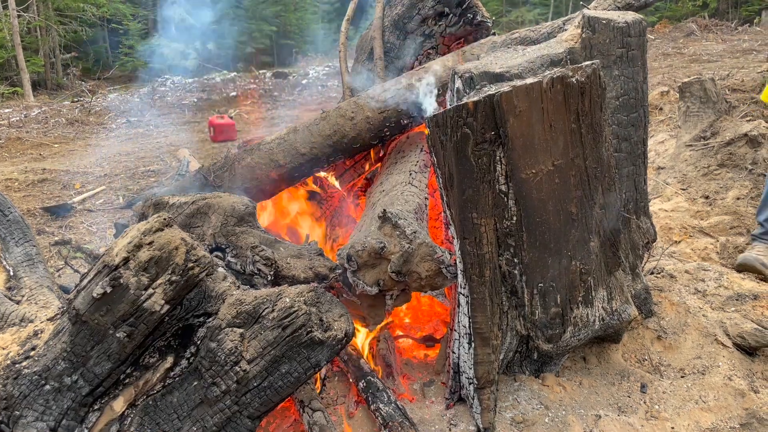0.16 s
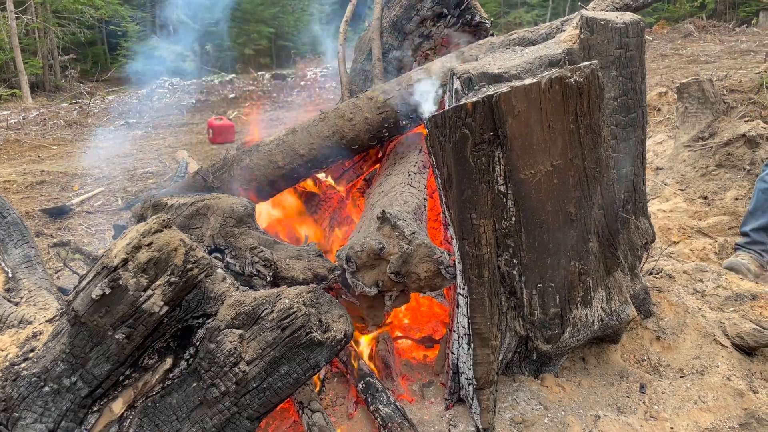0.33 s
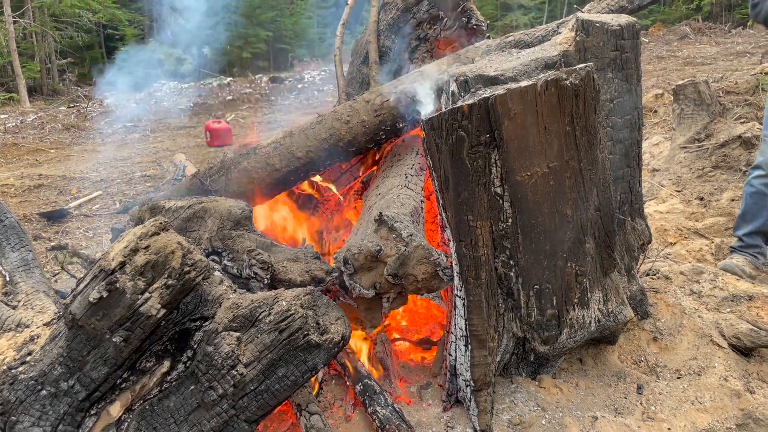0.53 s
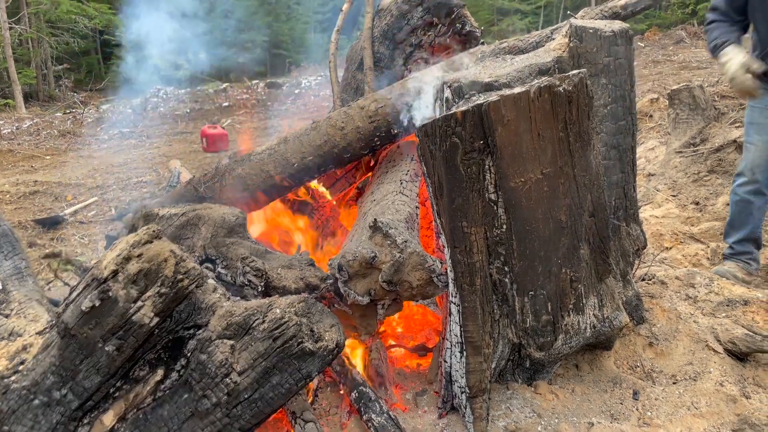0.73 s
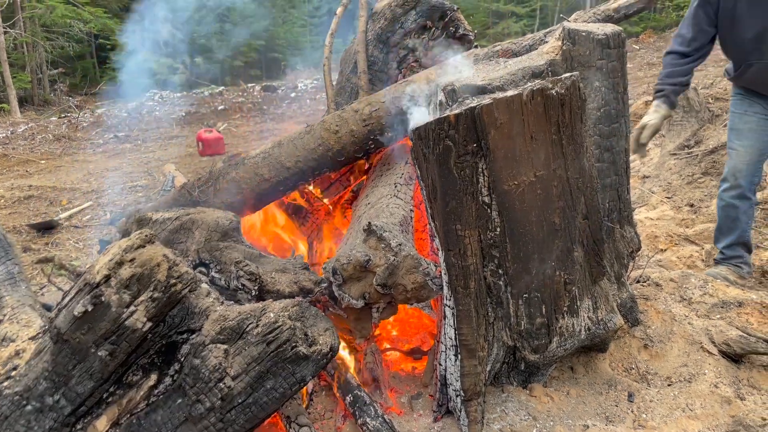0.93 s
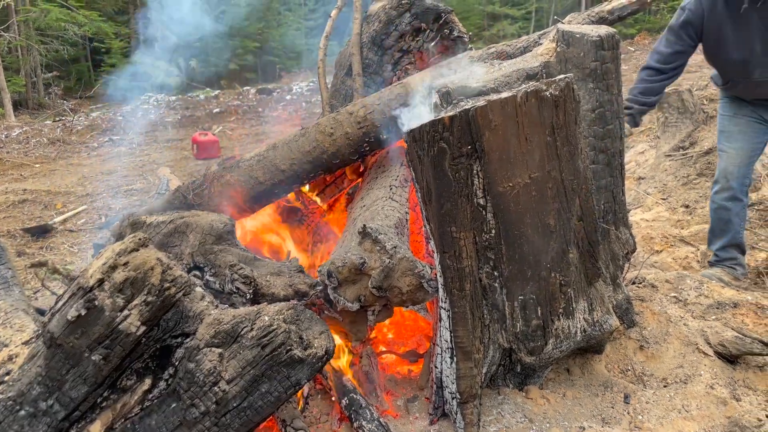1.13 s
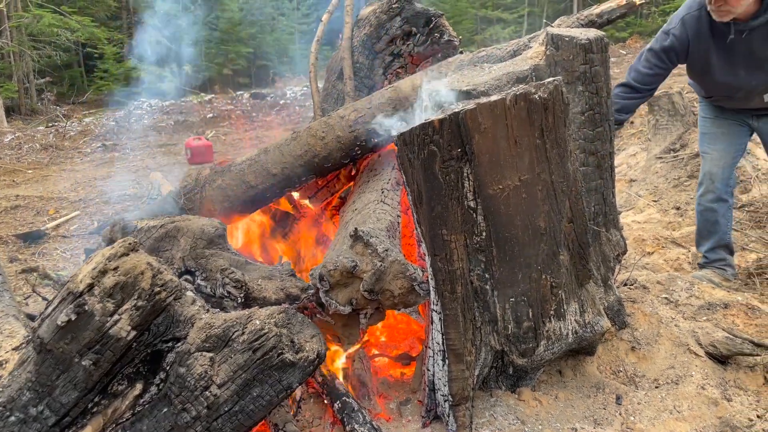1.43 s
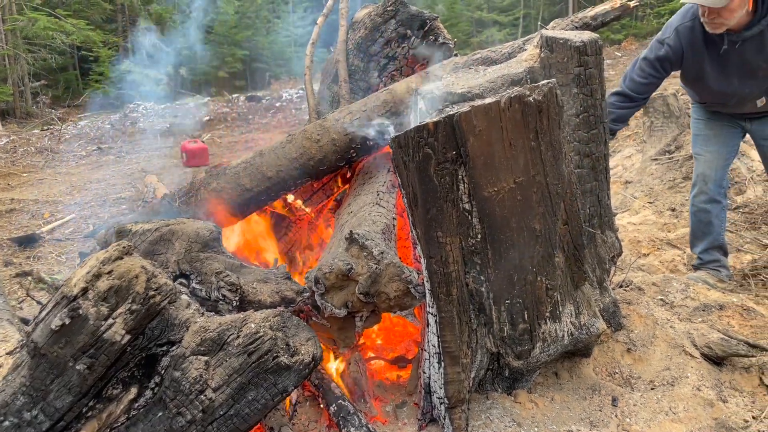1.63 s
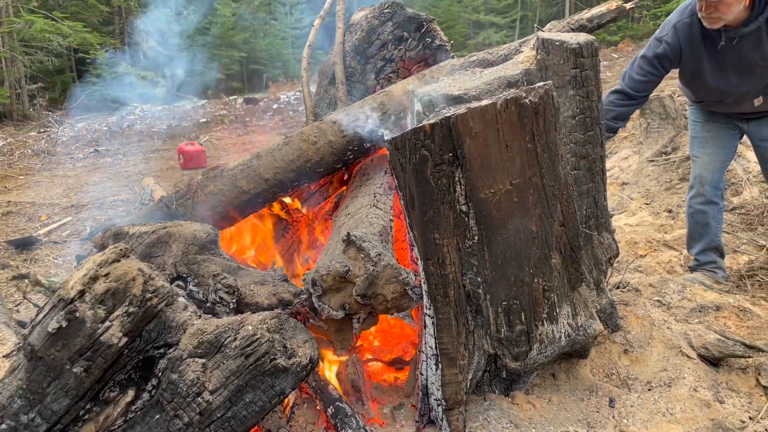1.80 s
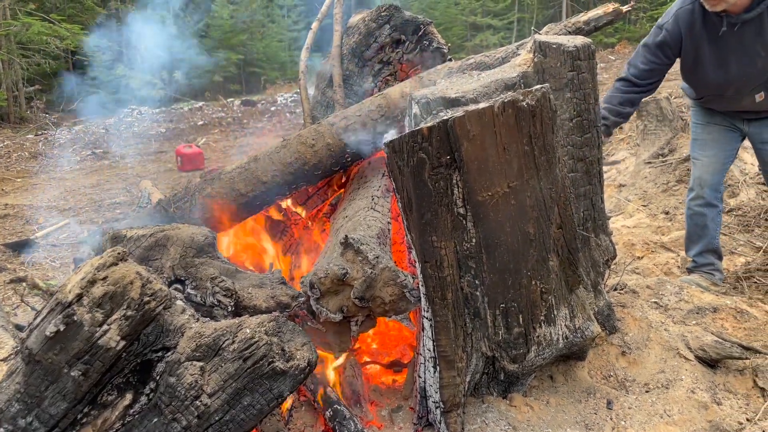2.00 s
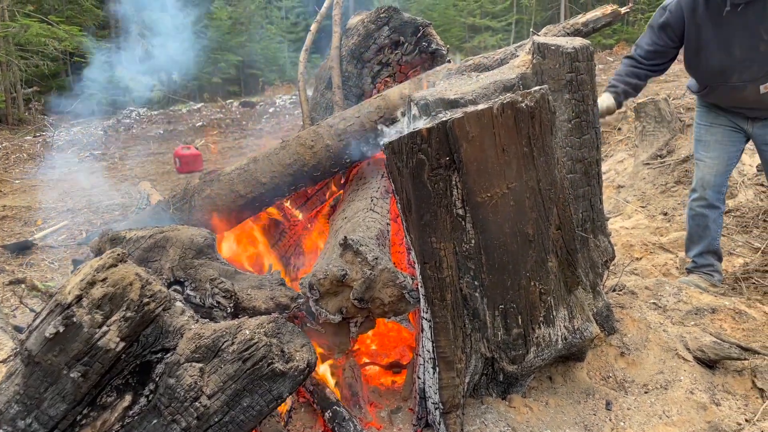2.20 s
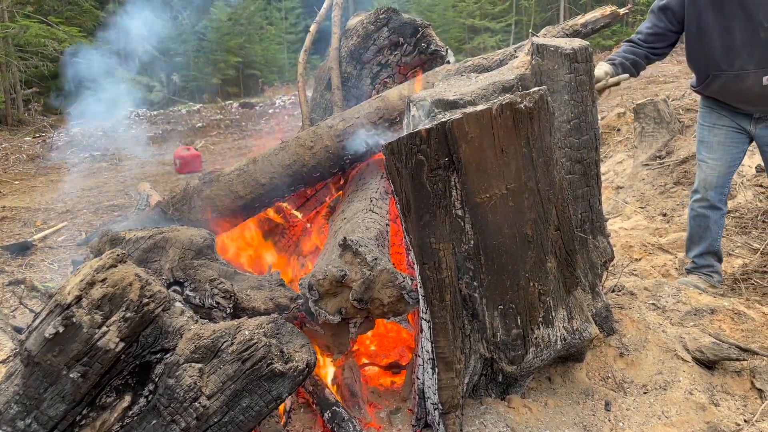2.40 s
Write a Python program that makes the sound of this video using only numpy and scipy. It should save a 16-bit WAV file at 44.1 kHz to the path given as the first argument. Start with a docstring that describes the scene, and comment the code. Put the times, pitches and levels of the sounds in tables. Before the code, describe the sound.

A wood fire crackles throughout about 2.5 seconds, with irregular dry pops and tiny bright ticks leaning slightly left. Snaps cluster around 0.2 s, then the loudest, a hollow woody knock, bursts at 0.36 s. Sharp cracks follow near 0.84, 1.1, 1.53 and 2.05 s. A light rustle flicks at 1.53-1.75 s. Faint low flame rumble and thin hiss lie beneath, with a short dull outdoor tail.

```python
"""Campfire in a forest clearing

A fire of stumps and logs burns a few metres from a two-port microphone. A low roar of flame, a thin
hiss and a passing rustle are shaped noise; tiny ticks are filtered noise bursts. Pockets of sap and gas
burst as short pops: noise bursts in three bands, with decaying modes for the knocked wood. The trees
send back a dull tail, made by convolution with dying noise."""
import sys
import numpy as np
from scipy import signal
from scipy.fft import rfft, irfft, next_fast_len
from scipy.io import wavfile

SR = 44100
rng = np.random.default_rng(int(sys.argv[2]) if len(sys.argv) > 2 else 0)


def inscribe(sig):
    """Save sig as 16-bit PCM at rate SR to the path in sys.argv[1].

    A 1-D sig is mono; a 2-D sig holds one channel per row.
    Samples are clipped to [-1, 1] before scaling.
    """
    pcm = np.round(np.clip(np.atleast_2d(sig).T, -1, 1) * 32767)
    wavfile.write(sys.argv[1], SR, pcm.astype(np.int16))


N = 112454  # samples in the scene


def amp(db):
    """Decibel law: twenty decibels are a factor of ten in amplitude."""
    return 10 ** (np.asarray(db) / 20)


def rms_one(x):
    """Normalisation to unit root-mean-square amplitude."""
    return x / np.sqrt(np.mean(x ** 2) + 1e-20)


def peak_at(x, db):
    """Peak normalisation: the largest excursion is set to a level."""
    return amp(db) * x / abs(x).max()


def band(x, low_hz, high_hz):
    """Band limitation by a Butterworth band-pass."""
    sos = signal.butter(2, [low_hz, high_hz], "band", fs=SR, output="sos")
    return signal.sosfilt(sos, x + 1e-18)


def add(out, start_s, x):
    """Superposition: a sound adds to those already present."""
    i = int(start_s * SR)
    out[i:i + len(x)] += x


def drift(rate_hz):
    """Low-pass random process: noise through two equal poles wanders slowly, with unit rms."""
    step = 40  # samples between computed points
    pole = np.exp(-2 * np.pi * rate_hz * step / SR)
    white = rng.standard_normal(N // step + 2002)
    slow = signal.lfilter([1], [1, -2 * pole, pole * pole], white)[2000:]  # settled part
    return np.interp(np.arange(N) / step, np.arange(len(slow)), rms_one(slow))


# Phase lead of the left port over the right.
# Columns: pitch_hz [Hz], left_lead_rad [radians]
PORT_PHASE = [(0, 0), (4000, .3), (5000, 1.4), (6600, -1), (8200, -3.1), (11500, -6.3), (14600, -9.4),
              (17000, -12.6)]


def ports(x, lean_db):
    """Interchannel phase and level differences: both depend on pitch, the lean most in the middle range."""
    pitch_hz, lead_rad = np.transpose(PORT_PHASE)
    f = np.fft.rfftfreq(N, 1 / SR)
    half_phase = np.exp(.5j * np.interp(f, pitch_hz, lead_rad))
    lean_shape = (f + 250) / (f + 900) / (1 + (f / 5000) ** 2)
    left = half_phase * amp(lean_db / 2 * lean_shape)
    return irfft(rfft(x) * np.array([left, 1 / left]), N)


def noise(spectrum, patchy_db, rate_hz, wide, lean_db):
    """Modulated coloured noise: half-octave bands flicker, a share is unrelated by channel; unit rms."""
    pitch_hz, density_db = np.transpose(spectrum)
    f = np.fft.rfftfreq(N, 1 / SR) + 1
    colour = amp(np.interp(np.log(f), np.log(pitch_hz), density_db))
    colour = colour * np.minimum(f / pitch_hz[0], 1) ** 4 * np.minimum(pitch_hz[-1] / f, 1) ** 4

    wide = np.clip(wide, 0, 1)
    shared = ports(rng.standard_normal(N), lean_db)
    white = np.sqrt(1 - wide) * shared + np.sqrt(wide) * rng.standard_normal((2, N))
    coloured = irfft(rfft(white) * colour, N)

    pad = next_fast_len(N)
    spec = rfft(coloured, pad)
    place = 2 * np.log2(np.fft.rfftfreq(pad, 1 / SR) + 1)  # in half octaves
    together = drift(rate_hz / 2)  # common to all bands
    first, last = int(2 * np.log2(pitch_hz[0])) - 1, int(2 * np.log2(pitch_hz[-1])) + 2
    out = 0
    for k in range(first, last + 1):
        window = np.clip(1 - abs(place - k), 0, 1)  # overlapping triangles
        flicker = amp(patchy_db * (.5 * together + drift(rate_hz)))
        out = out + irfft(spec * window, pad)[:, :N] * flicker
    return rms_one(out)


# Relative spectral density of the flame's roar.
# Columns: pitch_hz [Hz], density_db [dB per Hz]
ROAR_SPECTRUM = [(21, -39), (35, -7), (81, -3.5), (346, -23.5), (1040, -52), (1760, -120)]
ROAR_DB = -45.5  # rms


def roar():
    """Low-frequency broadband noise: the flame's slightly flickering rumble."""
    return amp(ROAR_DB) * noise(ROAR_SPECTRUM, patchy_db=-0.5, rate_hz=31, wide=0.014, lean_db=3.5)


# Relative spectral density of the thin hiss.
# Columns: pitch_hz [Hz], density_db [dB per Hz]
HISS_SPECTRUM = [(350, -4), (600, -2.5), (1040, -11.5), (1720, -19.5), (5210, -22), (8600, -14.5),
                 (11200, -18), (14000, -24)]
HISS_DB = -60.5  # rms


def hiss():
    """Broadband noise: a faint hiss that extends into the treble."""
    return amp(HISS_DB) * noise(HISS_SPECTRUM, patchy_db=.4, rate_hz=40, wide=.2, lean_db=1)


# Relative spectral density of the passing rustle.
# Columns: pitch_hz [Hz], density_db [dB per Hz]
RUSTLE_SPECTRUM = [(710, -22), (1200, -2), (1950, -1), (2400, 4.5), (3000, 0), (5390, -4.5), (7500, -13.5),
                   (9750, -56)]
# Level course of the rustle.
# Columns: start_s [s], level_db [dB]
RUSTLE_COURSE = [(0, -63), (0.449, -63.5), (.65, -59), (1.05, -59.5), (1.2, -63.5), (1.51, -67),
                 (1.535, -49.5), (1.578, -53), (1.61, -61.5), (1.639, -49.5), (1.76, -58), (2.02, -61),
                 (2.15, -65.5)]


def rustle():
    """Amplitude modulation: a level course swells and lowers rapidly flickering noise."""
    start_s, level_db = np.transpose(RUSTLE_COURSE)
    level = amp(np.interp(np.arange(N) / SR, start_s, level_db))
    return level * noise(RUSTLE_SPECTRUM, patchy_db=3.5, rate_hz=118.0, wide=0.77, lean_db=-8.5)


MS = np.arange(1400) / SR * 1000  # time axis of one burst or blow, in ms
# time constants of the burst; level of its tail relative to the fast decay
RISE_MS, DECAY_MS, TAIL_MS, TAIL_DB = 0.44, 0.77, 3.79, -21.5


def bursts(count):
    """Transient envelope: noise rises quickly, decays fast and leaves a faint exponential tail."""
    rise = (1 - np.exp(-MS / RISE_MS)) ** 2
    decay = np.exp(-MS / DECAY_MS) + amp(TAIL_DB) * np.exp(-MS / TAIL_MS)
    return rise * decay * rng.standard_normal((count, len(MS)))


# Small bright cracks without a body; levels are peaks at the source.
# Columns: start_s [s], level_db [dB], pitch_hz [Hz, band centre]
BRIGHT_TICKS = [(0.0931, -35.5, 3880), (0.194, -27, 3562), (0.2938, -33, 4730), (0.4255, -41, 5210),
                (0.5992, -39.5, 5225), (0.6805, -38.5, 4730), (0.6862, -48, 5334), (0.7127, -39, 2570),
                (0.7202, -40, 4240), (0.8493, -53, 5654), (1.0545, -40, 5784), (1.3223, -47.5, 3515),
                (1.3624, -33, 8650), (1.4443, -34.5, 3640), (1.8634, -45, 7154), (1.8845, -35, 5400),
                (2.0687, -41, 3800), (2.1027, -32, 3074), (2.2371, -36, 5760), (2.2578, -28.5, 5660),
                (2.3153, -36, 3280), (2.5136, -32, 5220)]
TICKS_PER_S, TICK_DB, TICK_SPREAD_DB = 28, -50.5, 2.5  # faint ticks: rate, lowest peak (about), spread


def ticks():
    """Random impulsive noise: listed cracks, with fainter ones at independent chance moments."""
    chance = rng.random((int(TICKS_PER_S * N / SR), 3))
    rows = list(BRIGHT_TICKS)
    for u, v, w in chance:
        level_db = TICK_DB - TICK_SPREAD_DB * np.log(v + .02)  # few are much louder
        rows.append((u * N / SR, level_db, 2500 * 3 ** w))
    out = np.zeros(N + SR)
    for (start_s, level_db, pitch_hz), burst in zip(rows, bursts(len(rows))):
        crack = band(burst, pitch_hz / 2, min(2.09 * pitch_hz, .45 * SR))
        add(out, start_s, peak_at(crack, level_db))
    return out[:N]


CONTACT_CYCLES = 0.17  # time constant of the soft blow, in cycles of the struck pitch


def ring(pitch_hz, modes):
    """Modal superposition: a soft blow excites decaying modes of one piece of wood, signs alternating."""
    turns = pitch_hz * MS / 1000
    tones = 0
    for k, (ratio, level_db, cycles) in enumerate(modes):
        decay = amp(level_db - 60 * ratio * turns / cycles)
        tones = tones + (-1) ** k * decay * np.sin(2 * np.pi * ratio * turns)
    return tones * (1 - np.exp(-turns / CONTACT_CYCLES)) ** 2


# Bursting pockets of sap and gas; levels are peaks at the source.
# Columns: start_s [s], thump_level_db [dB], thump_pitch_hz [Hz], knock_level_db [dB],
# knock_pitch_hz [Hz], crack_level_db [dB], snap_level_db [dB], spit_level_db [dB]
SAP_POPS = [(0.177, -40, 277, -32, 920, -43, -30, -27.5), (0.181, -34.5, 278, -30, 660, -20.5, -34, -23),
            (0.213, -55.5, 372, -37, 610, -30.5, -23.5, -29),
            (0.24, -35.5, 352, -25, 1200, -17, -17.5, -25), (0.316, -45, 363, -34.5, 855, -25, -42, -44),
            (0.358, -14, 330, -3.5, 780, -23, -27.5, -32.5), (0.543, -37, 403, -34, 750, -47, -38.5, -43),
            (0.627, -45, 290, -37, 746, -48, -54, -57), (0.66, -42.5, 283, -43.5, 964, -35, -32, -36),
            (0.777, -68, 300, -38.5, 830, -44, -42.5, -42.5), (0.835, -36, 330, -26, 1100, -32, -16, -17.5),
            (0.841, -51, 300, -30, 1150, -24.5, -27.5, -29),
            (0.878, -33.5, 224, -48, 845, -38.5, -51, -42.5),
            (0.984, -31.5, 251, -25.5, 829, -20, -25.5, -52),
            (1.015, -42.5, 311, -41, 690, -35, -25, -33.5),
            (1.108, -40.5, 313, -31, 966, -24.5, -17, -20.5),
            (1.242, -46, 246, -41.5, 900, -34, -36.5, -36.5), (1.38, -30, 293, -35.5, 654, -31, -50, -65),
            (1.492, -45.5, 263, -42, 602, -30.5, -29, -30), (1.528, -25, 248, -30.5, 775, -16.5, -19, -42),
            (1.651, -49, 270, -36.5, 1000, -39, -36, -37), (1.658, -47, 249, -37, 710, -31, -36, -33),
            (1.731, -34, 344, -25.5, 602, -21.5, -21, -27),
            (1.811, -32.5, 405, -26.5, 726, -29, -29.5, -29.5), (1.818, -43, 314, -35, 850, -31, -39, -39),
            (1.924, -45, 211, -41.5, 1120, -40, -37, -31), (1.984, -38.5, 330, -37.5, 740, -36, -44, -34),
            (2.043, -42, 297, -41, 796, -26, -21, -19), (2.072, -35, 296, -26, 664, -17.5, -19.5, -17),
            (2.113, -38.5, 254, -34, 900, -29, -32.5, -36), (2.146, -45, 224, -36.5, 930, -38.5, -50, -43),
            (2.251, -37.5, 298, -29, 750, -26.5, -44, -24), (2.375, -49, 310, -37, 744, -37, -47, -60),
            (2.397, -61.5, 315, -40.5, 860, -41.5, -41, -47), (2.419, -44, 264, -38, 740, -38, -32.5, -34)]
# Modes of a log; levels are relative.
# Columns: pitch_ratio [1], level_db [dB], decay_cycles [cycles to -60 dB]
LOG_MODES = [(0.95, 0, 3.5), (0.54, -6, 3)]
# Modes of a splinter; levels are relative.
# Columns: pitch_ratio [1], level_db [dB], decay_cycles [cycles to -60 dB]
SPLINTER_MODES = [(0.998, -4, 9.5), (1.6, -1.5, 5)]
THUMP_LATE_MS = 2.37


def pops():
    """Impulsive excitation: a three-band burst and a blow on the wood, whose low thump comes late."""
    out, burst = np.zeros(N + SR), bursts(len(SAP_POPS))
    cracks = band(burst, 1400, 4160)
    snaps = band(burst, 2935, 6600)
    spits = band(burst, 11240, 15200)
    for k, row in enumerate(SAP_POPS):
        start_s, thump_db, thump_hz, knock_db, knock_hz, crack_db, snap_db, spit_db = row
        thump = peak_at(ring(thump_hz, LOG_MODES), thump_db)
        knock = -peak_at(ring(knock_hz, SPLINTER_MODES), knock_db)
        crack = peak_at(cracks[k], crack_db)
        snap = peak_at(snaps[k], snap_db)
        spit = peak_at(spits[k], spit_db)
        add(out, start_s + THUMP_LATE_MS / 1000, thump)
        add(out, start_s, knock + crack + snap + spit)
    return out[:N]


TREES_DB = -20  # energy of the tail before its band-pass
TREES_T60_S, TREES_START_S, TREES_HZ = 0.063, .006, 2210  # decay, build-up constant, upper band edge


def trees(x):
    """Diffuse reverberation: convolution with a dull dying wash, independent in each channel."""
    t = np.arange(SR // 2) / SR
    envelope = amp(-60 * t / TREES_T60_S) * (1 - np.exp(-t / TREES_START_S))
    tail = rng.standard_normal((2, len(t))) * envelope
    tail = band(tail / np.sqrt(np.sum(tail ** 2) / 2), 310, TREES_HZ)
    return amp(TREES_DB) * signal.fftconvolve(tail, x[None], axes=1)[:, :N]


POP_LEAN_DB = 7  # to the left, before the pitch-dependent shaping


def scene():
    """Linear superposition of the steady noises, the direct crackle and its reverberation."""
    fire = pops() + ticks()
    return roar() + hiss() + rustle() + ports(fire, POP_LEAN_DB) + trees(fire)


CUTOFF_HZ = 17000  # from here up at least 70 dB down


def record(dry):
    """Band limitation: the microphone loses the deepest bass, and the top is cut."""
    bass_cut = signal.butter(4, 42, "high", fs=SR, output="sos")
    top_cut = signal.cheby2(12, 70, CUTOFF_HZ, fs=SR, output="sos")
    return signal.sosfilt(top_cut, signal.sosfilt(bass_cut, dry))


dry = scene()
out = record(dry)
inscribe(out)
```